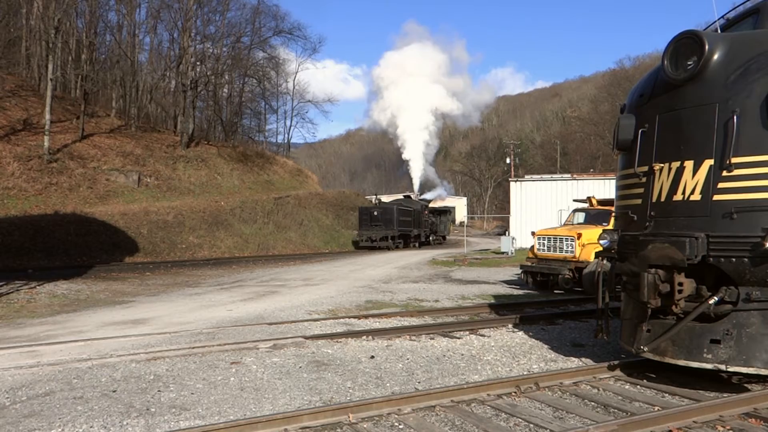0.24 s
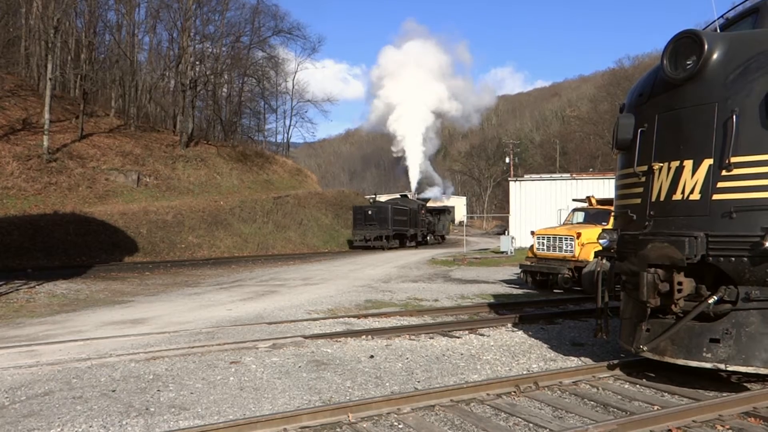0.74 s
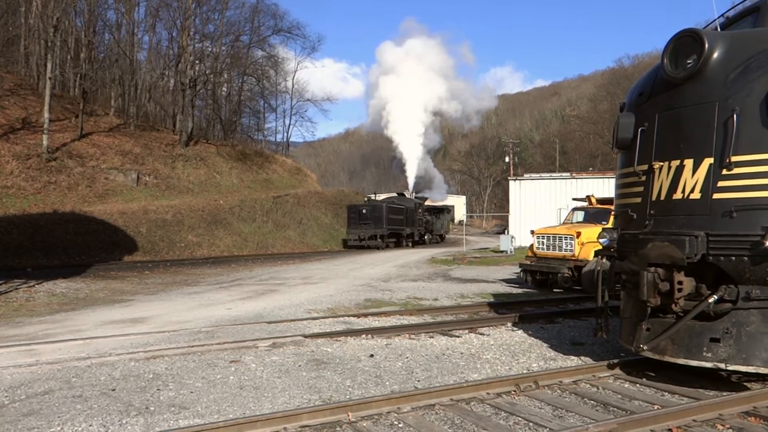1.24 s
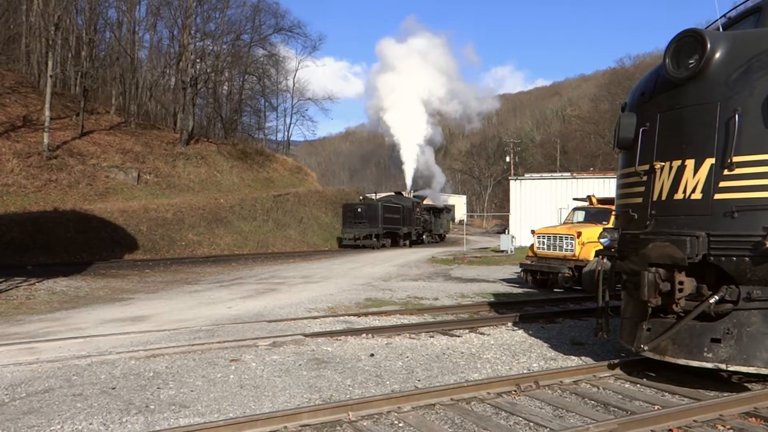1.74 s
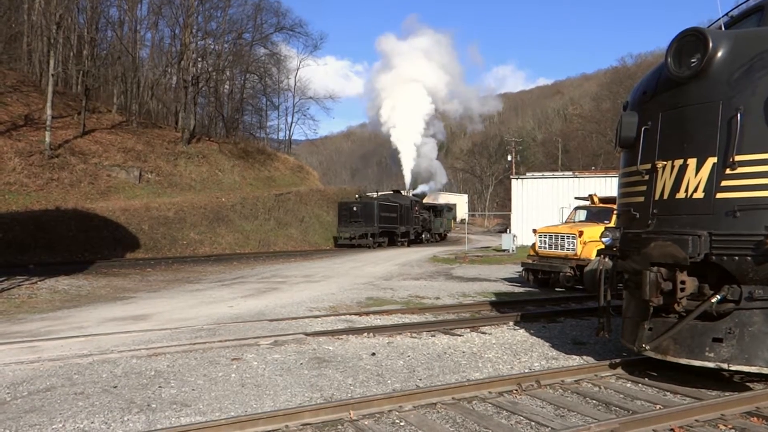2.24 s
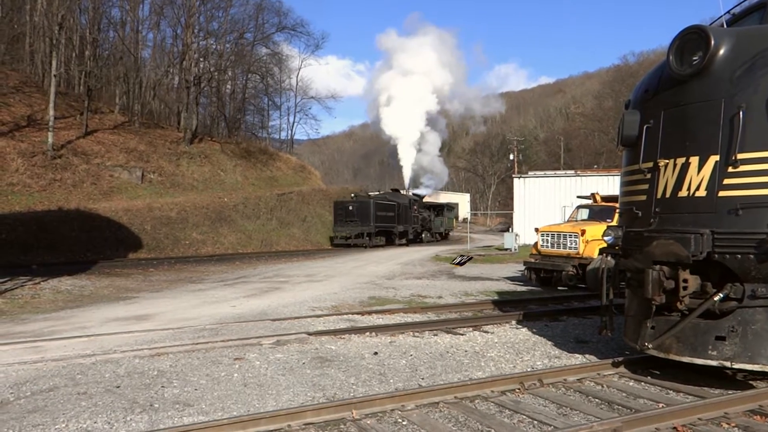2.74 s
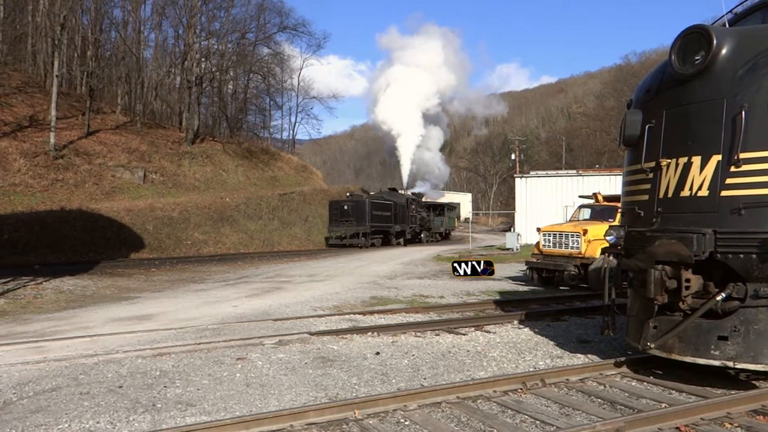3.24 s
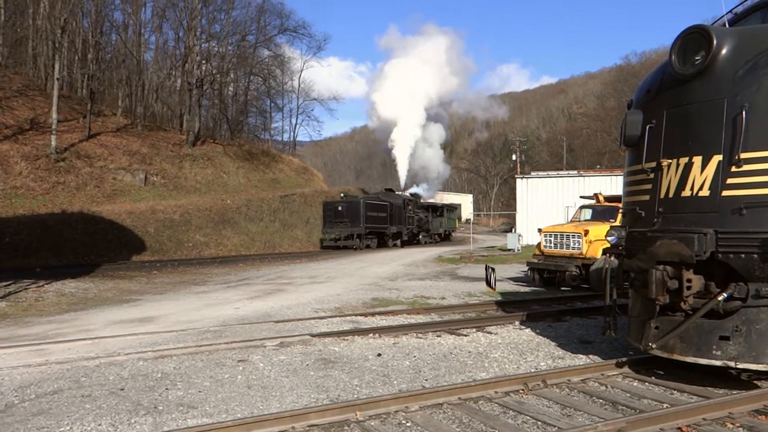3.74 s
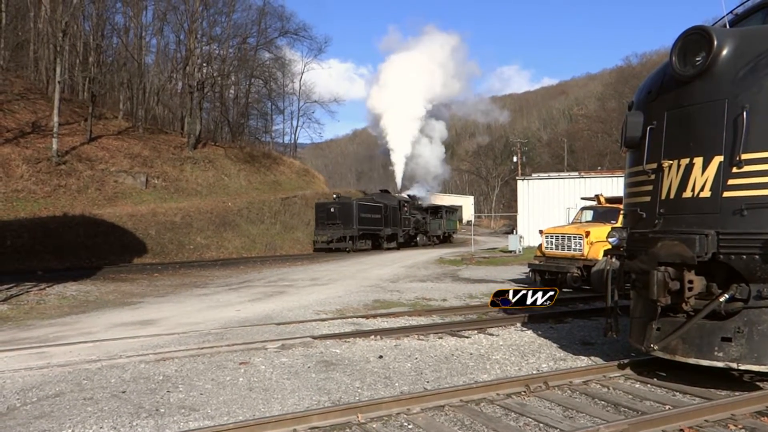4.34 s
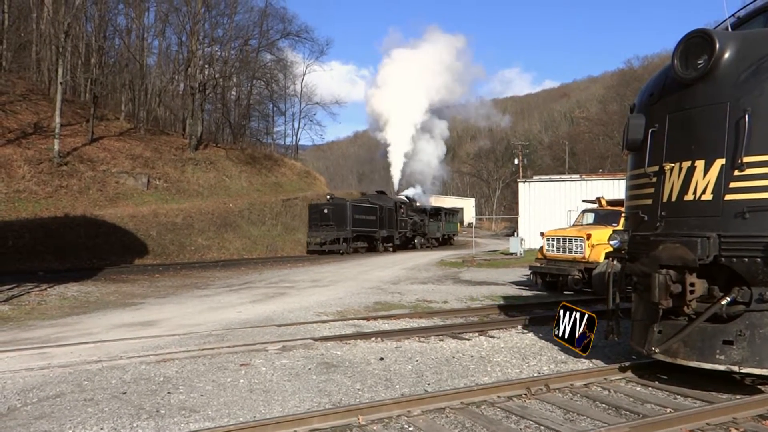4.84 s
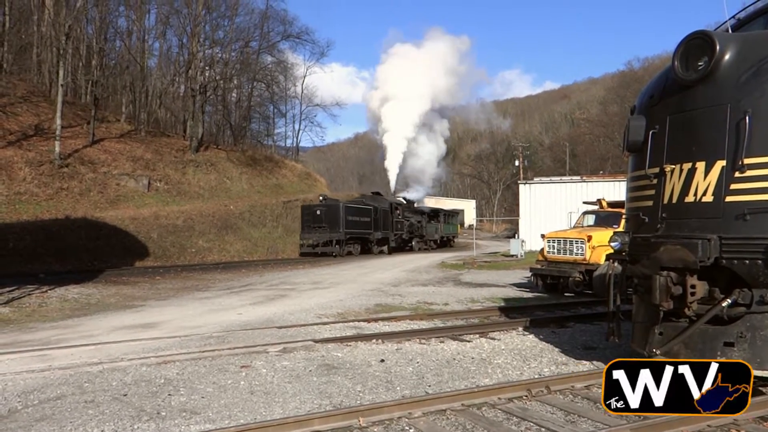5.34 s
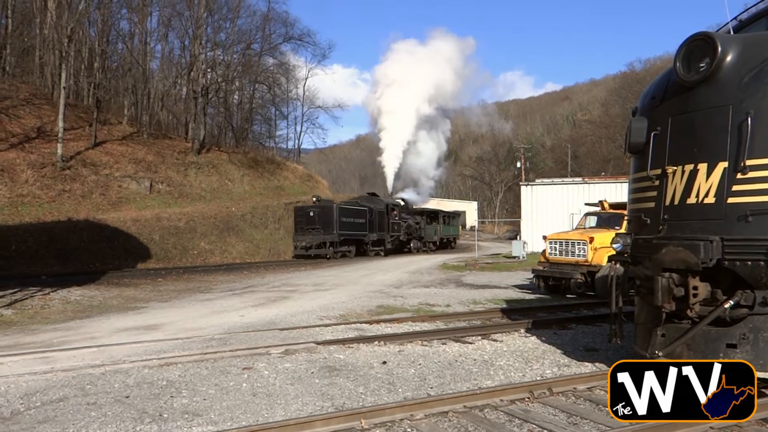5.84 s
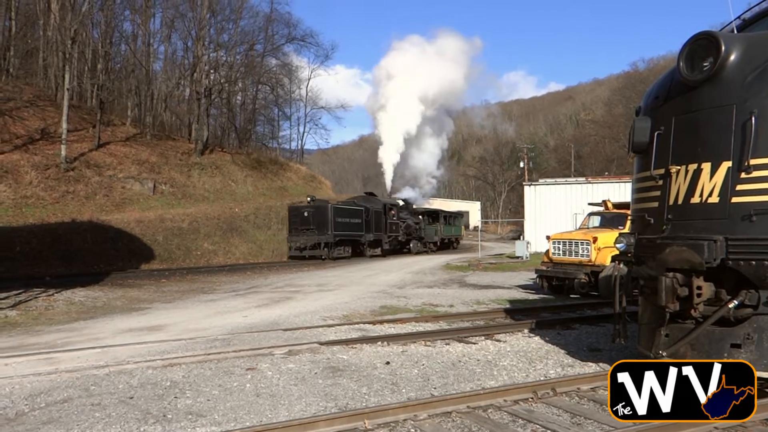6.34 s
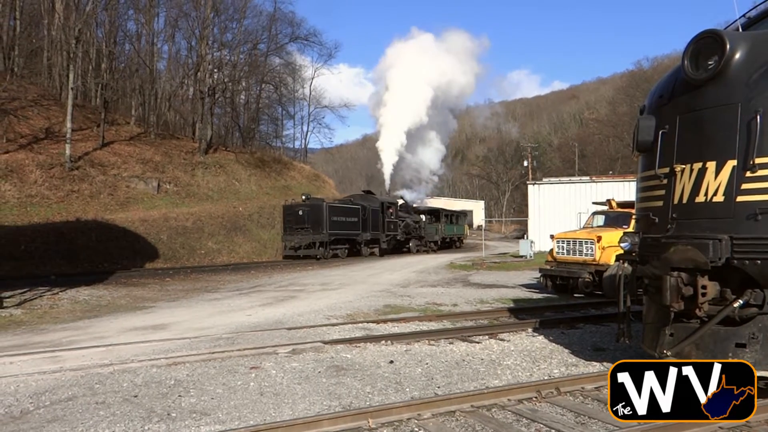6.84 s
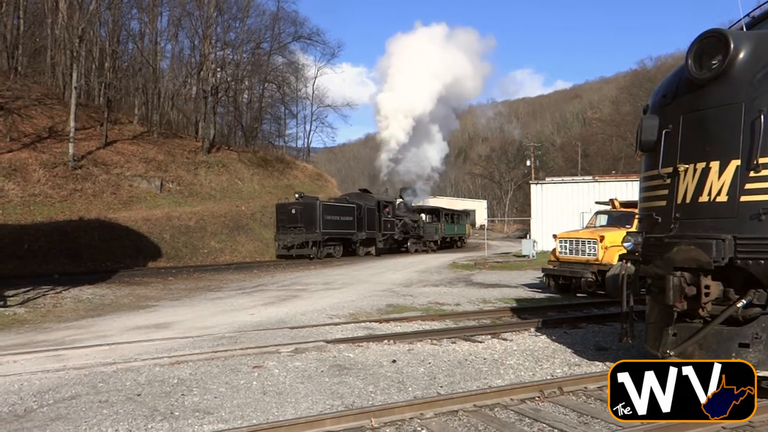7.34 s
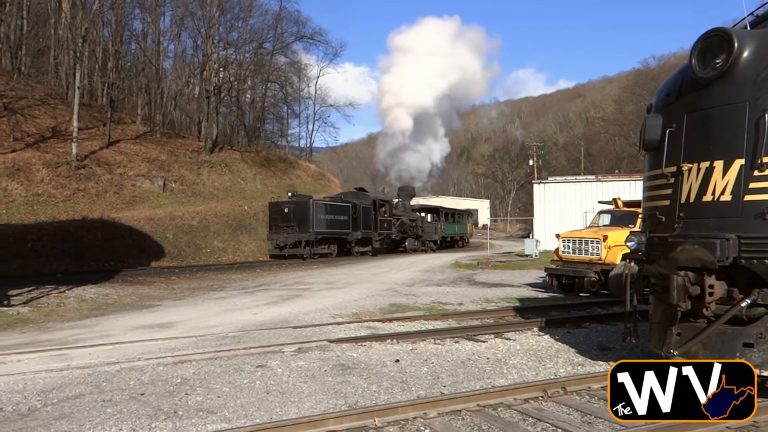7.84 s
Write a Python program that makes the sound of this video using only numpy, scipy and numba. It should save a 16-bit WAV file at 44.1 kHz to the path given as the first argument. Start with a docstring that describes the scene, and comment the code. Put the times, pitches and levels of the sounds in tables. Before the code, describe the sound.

A fixed stereo microphone hears an engine creeping some distance away. Dense escaping steam dominates, carrying a rough high whistle that becomes purer, trembling and rising slightly. Slow low chuffs sit beneath. The steam grows thinner and sharper, sputters with short ragged squeaks, and snaps shut near the end. The surrounding hills hold a brief airy echo, leaving quiet exhaust beats, a faint hush and a few tiny bird chips.

```python
"""A safety valve blows off steam on a locomotive creeping through a yard in a valley.
Shaped noise makes the hiss; a trembling tone and its octave make the whistle, which clears and climbs.
Short sliding tones squeal as the valve chatters, then the steam stops and the hills ring on.
Noise ringing in a chimney makes the chuffing engine, over a faint hush. Pitch dips make a small bird."""
import sys
import numpy as np
from scipy import signal
from scipy.fft import rfft, irfft
from scipy.io import wavfile
from scipy.ndimage import uniform_filter1d
from numba import njit

SR = 44100
rng = np.random.default_rng(int(sys.argv[2]) if len(sys.argv) > 2 else 0)


def generate_wav(sig):
    """Save sig (samples, or channels by samples) to the path in sys.argv[1] as 16-bit PCM at SR."""
    pcm = np.round(np.clip(np.atleast_2d(sig).T, -1, 1) * 32767).astype(np.int16)
    wavfile.write(sys.argv[1], SR, pcm)


N = 356749
TIME = np.arange(N) / SR  # seconds

# level of the engine's rumble as heard, which the beats follow, before trims: time_s [s], level_db [dB]
RUMBLE_LEVEL = [(0.0, -38.5), (1.3, -42.5), (2.37, -42), (5.0, -53), (5.57, -51), (6.02, -57.5),
                (8.09, -45)]


def gain_of(db):
    """Turn decibels into an amplitude factor."""
    return 10 ** (np.asarray(db) / 20)


def evened(x):
    """Scale a signal to an average power of 1."""
    return x / np.sqrt(np.mean(abs(x) ** 2) + 1e-20)


def read(points, hz):
    """Read a table at any frequency, with straight lines along a log frequency scale."""
    f, value = np.transpose(points)
    return np.interp(np.log(hz + 1), np.log(f + 1), value)


def curves(rows, t):
    """Read every column of a timed table at times t, with straight lines between rows."""
    s, *columns = np.transpose(rows)
    return [np.interp(t, s, c) for c in columns]


def add(mix, start_s, sound):
    """Add a sound into the mix at its start time, cut off at the end of the mix."""
    part = mix[round(start_s * SR):][:len(sound)]
    part += sound[:len(part)]


def noise(db_of, patchy_db, flicker_db):
    """Random short-time spectra shaped by db_of(t, hz), with drifting patches and a shared flicker."""
    frames, hz = N // 128 + 5, np.fft.rfftfreq(512, 1 / SR)[:, None]
    a, b, patches = rng.standard_normal((frames, 257, 3)).T
    patches = uniform_filter1d(patches, size=6, axis=0)
    patches = evened(uniform_filter1d(patches, size=24, axis=1))
    flicker = evened(uniform_filter1d(rng.standard_normal(frames), size=8))
    db = db_of(np.arange(frames) * 128 / SR, hz) + patchy_db * patches
    db = db + flicker_db * np.sqrt(hz / 8000) * flicker  # the treble flickers most
    spectra = (a + 1j * b) * gain_of(db)
    return signal.istft(spectra, nperseg=512, noverlap=384)[1][:N]


@njit
def smooth(x, share):
    """One-pole low-pass whose speed changes from sample to sample, power kept."""
    out, state = np.empty_like(x), 0j
    for i in range(len(x)):
        state += share[i] * (x[i] - state)
        out[i] = state * np.sqrt((2 - share[i]) / share[i])
    return out


def waver(width_hz):
    """Complex noise of about power 1 that wanders within about width_hz, with steep skirts."""
    a, b = rng.standard_normal((len(width_hz), 2)).T
    share = 1 - np.exp(-np.pi * width_hz.clip(1) / SR)
    wide = 1 - (1 - share) ** 4
    return smooth(smooth(a + 1j * b, share), wide) * np.sqrt(wide / 4)


def flutter():
    """A slow random swing of power 1: many sines from 1.5 to 12 Hz with random starting phases."""
    hz = np.geomspace(1.5, 12, num=24)[:, None]
    coarse = TIME[::64]
    swings = np.sin(2 * np.pi * (hz * coarse + rng.random(hz.shape))) / hz ** 0.21
    return np.interp(TIME, coarse, evened(swings.sum(0)))


def jet():
    """Turbulent steam rings in the valve pipe; the colour shifts up as the valve closes."""
    # steam jet: time_s [s], level_db [dB before trims], closure [0 open to 1 nearly shut]
    jet_course = [(0.0, -18, 0.01), (1.0, -20.5, 0.01), (1.5, -19, 0.09), (2.7, -21, 0.19),
                  (3.35, -20.5, 0.3), (3.65, -24.5, 0.45), (4.4, -26, 0.65), (4.9, -27.5, 0.83),
                  (5.15, -25.5, 0.74), (5.45, -25.5, 0.57), (5.9, -29, 0.83), (6.03, -32.5, 0.87),
                  (6.45, -29, 0.69), (6.6, -28.5, 0.63), (6.8, -29, 0.72), (7.09, -24.5, .5)]
    # hiss colour with the valve wide open: pitch_hz [Hz], level_db [dB per Hz, relative]
    open_colour = [(250, -30.5), (500, -17), (1000, -3.5), (1450, -12), (2000, -4.5), (2580, -9.5),
                   (3500, -6), (4700, -9.5), (5700, -9), (6100, -8), (9000, -8), (11000, -19),
                   (13000, -27.5), (15800, -32.5)]
    # hiss colour with the valve nearly shut: pitch_hz [Hz], level_db [dB per Hz, relative]
    shut_colour = [(250, -40.5), (500, -19), (1000, -11), (1450, -12), (2000, -6.5), (2550, -9), (3500, -9),
                   (4700, -3), (5400, 4), (6500, -3.5), (9000, -4.5), (11000, -8), (13000, -16.5),
                   (15800, -26)]
    # rings of the valve pipe: pitch_hz [Hz], width_hz [Hz, where the lift has halved],
    # open_lift_db [dB], nearly_shut_lift_db [dB]
    pipe_rings = [(1175, 300, 3, 3.5), (1732, 236, 3, 10.5), (2225, 243, 9.5, 5.5), (2776, 265, 2.5, 9.5),
                  (3250, 500, 3.5, 8.5), (3915, 140, 0.5, 8.5), (4320, 330, 3.5, 6.5),
                  (4980, 290, 6.5, 5.5), (5490, 270, 6.5, 5.5), (8800, 520, -0.5, 3),
                  (9880, 200, 2.5, -0.5), (8200, 250, 3.5, -1), (10400, 250, 1, 0)]
    top_open_db, top_shut_db = -2.5, 6.5  # treble lift, coming in around 7 kHz

    def field(t, hz):
        """Level of the hiss at each time and frequency."""
        level_db, closure = curves(jet_course, t)
        pipe_db = 0
        for ring_hz, width_hz, open_db, shut_db in pipe_rings:
            lift_db = open_db * (1 - closure) + shut_db * closure
            pipe_db = pipe_db + lift_db / (1 + (2 * (hz - ring_hz) / width_hz) ** 2)
        colour_db = read(open_colour, hz) * (1 - closure) + read(shut_colour, hz) * closure
        top_db = top_open_db * (1 - closure) + top_shut_db * closure
        return level_db + colour_db + pipe_db + top_db / (1 + (7000 / hz.clip(1)) ** 6)

    return gain_of(-13) * noise(field, patchy_db=0.53, flicker_db=1.32)


def whistle():
    """An edge tone in the valve gap: a steady part and a wavering part, with its octave."""
    # pitch before it trembles: time_s [s], pitch_hz [Hz]
    pitch_course = [(0, 5725), (.5, 5775), (1, 5805), (1.5, 5768), (2.75, 5782), (3.3, 5845), (3.6, 5868),
                    (4.3, 5910), (5.4, 5925), (5.5, 6045), (5.575, 5935), (5.65, 5935), (5.705, 6095),
                    (5.765, 6000), (5.81, 6120), (5.835, 6030), (5.852, 6115), (5.875, 6020), (5.96, 6020),
                    (6.015, 6180), (6.19, 6095), (6.29, 6185), (6.33, 6120), (6.49, 6115), (6.57, 6260),
                    (6.625, 6480), (6.69, 6295), (6.745, 6135), (6.85, 6125), (6.93, 6155), (7.0, 6165),
                    (7.05, 6225), (7.095, 6400)]
    # strength: time_s [s], level_db [dB before flutter], roughness [0-1], fuzz_width_hz [Hz]
    whistle_course = [(0, -26, .9, 110), (.9, -17.5, 0.93, 90), (1.38, -22.5, 1, 100),
                      (1.55, -21, 0.85, 200), (1.7, -20.5, 0.98, 90), (2.3, -22, .7, 90), (3, -21, .45, 60),
                      (3.45, -19.5, 0.5, 45), (3.65, -17.5, .35, 39.7), (4.97, -16, 0.29, 40),
                      (5.08, -23.5, 0.2, 39.8), (5.36, -18.5, 0.18, 39.9), (5.95, -19.5, 0, 40),
                      (6.03, -12, 0.2, 40), (6.2, -20, 0.2, 40.2), (6.46, -11.5, 0.27, 40),
                      (6.53, -27, 0.4, 80), (6.63, -25, 1, 200), (6.675, -21, 0.4, 50),
                      (6.78, -18, 0.1, 50), (6.94, -19, 0.5, 55), (7.03, -10, .45, 58.3),
                      (7.1, -24, 0.3, 60)]
    # the octave is strong at some pitches and weak at others:
    # whistle_pitch_hz [Hz], octave_db [dB before roughness and flutter]
    octave_strength = [(5720, -47), (5780, -28.5), (5870, -35), (5915, -36.5), (5950, -24.5), (6020, -25.5),
                       (6090, -35.5), (6130, -30.5), (6170, -35), (6270, -23), (6450, -45)]
    tremble_hz, flutter_db, octave_flutter_db = 10.8, 1, 2  # typical size of each random swing
    rough_octave_db = -11  # a rough whistle loses its octave

    (hz,) = curves(pitch_course, TIME)
    level_db, rough, width_hz = curves(whistle_course, TIME)
    rough = rough.clip(0, 1)
    hz = hz + tremble_hz * flutter()
    level_db = level_db + flutter_db * flutter()
    octave_db = read(octave_strength, hz) + rough_octave_db * rough + octave_flutter_db * flutter()
    body = np.sqrt(1 - rough ** 2) + rough * waver(width_hz)
    tone = body * np.exp(2j * np.pi * np.cumsum(hz) / SR)
    octave = tone ** 2 / (abs(tone) + 0.13)  # the wave steepens: twice the phase
    return np.sqrt(2) * (gain_of(level_db) * tone + gain_of(octave_db) * octave).real


def chuffs():
    """Times and levels of the exhaust beats of an engine that slowly speeds up, four beats a turn."""
    # beats in one turn of the crank: place [0-1 of a turn], over_db [dB over the rumble, before trims]
    beats = [(0, 16), (.235, 10), (.49, 7), (.72, 9)]
    # trim of the beats' loudness, one value a turn: level_db [dB]
    turn_level = [-6, -2, 1, -1.5, 4, -1, -0.5, -4, -11, -6]
    first_turn_s, turns_per_s, speedup_per_s2 = .453, 1.054, .02  # speed is that at first_turn_s
    beat_spread_db = 1

    place, over_db = np.transpose(beats)
    turns = (np.arange(-1, 9)[:, None] + place).ravel()
    speed = np.sqrt(turns_per_s ** 2 + 2 * speedup_per_s2 * turns)  # turns per second at each beat
    s = first_turn_s + (speed - turns_per_s) / speedup_per_s2
    db = curves(RUMBLE_LEVEL, s)[0] + np.add.outer(turn_level, over_db).ravel()
    db = db + beat_spread_db * rng.standard_normal(len(s))
    heard = (s > 0) & (s < TIME[-1])
    return zip(s[heard], db[heard])


def engine():
    """A low rumble, and puffs of exhaust that ring in the chimney."""
    # rumble colour: pitch_hz [Hz], level_db [dB per Hz, relative]
    rumble_colour = [(15, -46.5), (25, -14), (150, 1), (184, 1.5), (253, -1.5), (298, -6), (540, -5.5),
                     (606, -7), (745, -12), (2240, -21), (5600, -39), (6000, -44), (7800, -78.5),
                     (13200, -120)]
    # chimney rings: pitch_hz [Hz], width_hz [Hz, between points 6 dB down], level_db [dB, relative]
    chimney_rings = [(101, 27, -7.5), (174.6, 31, -3), (272, 50, -13.5), (566, 60, -11)]

    hz = np.fft.rfftfreq(N, 1 / SR)
    coloured = rfft(rng.standard_normal(N)) * gain_of(read(rumble_colour, hz))
    rumble = gain_of(0.5 + curves(RUMBLE_LEVEL, TIME)[0]) * evened(irfft(coloured, N))
    chimney = sum(gain_of(db) / (1 + 2j * (hz - f) / w) ** 2 for f, w, db in chimney_rings)
    puff = evened(irfft(rfft(rng.standard_normal(N)) * chimney, N))

    t, pressure, blows = np.arange(8000) / SR, np.zeros(N), np.zeros(N)
    for s, db in chuffs():
        # steam pressure jumps up in a few milliseconds, then falls 60 dB per 0.33 s
        add(pressure, s, gain_of(db - 60 * t / 0.33) * (1 - np.exp(-t / 0.0047)))
        add(blows, s, [gain_of(db)])
    ring = irfft(chimney, N)  # each beat also knocks the chimney once
    thump = irfft(rfft(blows) * chimney, N) / abs(ring).max()
    return rumble + gain_of(-8.5) * pressure * puff + gain_of(-0.5) * thump


def air():
    """The still air of the yard: a faint hush of shaped noise."""
    # hush colour: pitch_hz [Hz], level_db [dB per Hz, relative]
    hush_colour = [(880, -24), (1500, -0.5), (3000, -6), (5790, -20), (5990, -21), (7130, -19),
                   (11000, -36), (14300, -74.5), (22000, -120)]
    hush = noise(lambda t, hz: read(hush_colour, hz) + 0 * t, patchy_db=-0.5, flicker_db=3.0)
    return gain_of(-60) * evened(hush)


def valley(x):
    """Countless echoes through restless air: each band's power lingers and dies, with random phase."""
    # how long the hills ring: pitch_hz [Hz], fade_s [s to fall by 60 dB]
    hill_fade = [(200, 0.56), (700, 1.3), (1400, 2.16), (2500, 1.6), (4200, 1.07), (6200, 0.91),
                 (8000, 0.66), (10000, 0.54), (14000, 0.58)]
    hz, t, z = signal.stft(x, SR, nperseg=1024, noverlap=768)
    # share of the power kept from one frame to the next
    far = gain_of(-120 * t[1] / read(hill_fade, hz))
    near = gain_of(-120 * t[1] / 0.41)  # 0.41 s to fall by 60 dB
    power = np.array([signal.lfilter([0, 0, 1 - k], [1, -k], p) for k, p in zip(far, abs(z) ** 2)])
    power /= 1 + (hz[:, None] / 11000) ** 4  # the long path loses treble
    # wagons and sheds close by
    power += gain_of(-6.0) ** 2 * signal.lfilter([0, 1 - near], [1, -near], abs(z) ** 2)
    a, b = rng.standard_normal((len(t), len(hz), 2, 2)).T  # two independent echoes
    echoes = np.sqrt(power) * (a + 1j * b)
    return signal.istft(echoes, SR, nperseg=1024, noverlap=768)[1][:, :N]


def squeals():
    """Short, ragged tones as the valve disc chatters on its seat; the last is an echo of the whistle."""
    # tones: start_s [s], length_s [s], start_hz [Hz], end_hz [Hz], level_db [dB before raggedness]
    squeal_list = [(6.505, 0.057, 8250, 8150, -33), (6.53, 0.043, 6900, 6800, -29),
                   (6.533, 0.014, 5700, 5650, -30), (6.558, .04, 9200, 9300, -30.5),
                   (6.583, 0.024, 9100, 8350, -27), (6.598, 0.041, 7560, 7600, -22),
                   (6.608, .04, 8750, 8700, -30.5), (6.61, 0.041, 8200, 8200, -28),
                   (6.648, 0.037, 7370, 7380, -19), (6.66, .04, 8500, 8260, -32),
                   (6.682, 0.032, 7520, 7400, -24), (6.73, .022, 7460, 7450, -31),
                   (6.79, .022, 7480, 7480, -40), (7.068, 0.019, 8340, 8700, -20.5),
                   (7.085, 0.015, 7800, 7680, -18), (7.089, 0.011, 6950, 6800, -25),
                   (7.107, 0.038, 6300, 6180, -19.5)]
    out, ragged = np.zeros(N), 0.79 + 0.92 * waver(np.full(N, 250.))
    for s, length_s, start_hz, end_hz, db in squeal_list:
        hz = np.linspace(start_hz, end_hz, round(length_s * SR))
        wobble = ragged[round(s * SR):][:len(hz)] * signal.windows.tukey(len(hz), .4)
        tone = (wobble * np.exp(2j * np.pi * np.cumsum(hz) / SR)).real
        add(out, s, gain_of(db) * np.sqrt(2) * tone)
    return out


def bird():
    """Each chip sweeps down and up again, loudest at the bottom; branches smear a near echo."""
    # chips: lowest_point_s [s], lowest_hz [Hz], level_db [dB at the lowest point]
    chip_list = [(7.729, 7000, -55), (7.784, 6900, -53), (7.843, 6900, -51), (7.902, 6900, -51),
                 (7.961, 7000, -62), (7.984, 7000, -55)]
    t, out = np.arange(-300, 300) / SR, np.zeros(N)
    for s, low_hz, db in chip_list:
        hz = low_hz + 3200 * (abs(t) / 0.006) ** 1.6
        loudness = gain_of(db - 24 * abs(t) / 0.0089) * np.hanning(len(t)) ** .5
        add(out, s + t[0], np.sin(2 * np.pi * np.cumsum(hz) / SR) * loudness)
    late = np.arange(2500) / SR
    # the echo starts after 7 ms and falls 60 dB per 0.08 s
    smear = rng.standard_normal(len(late)) * gain_of(-60 * late / .08) * (late > .007)
    return out + gain_of(-9) * signal.oaconvolve(out, smear / np.linalg.norm(smear))[:N]


def scene():
    """Mix steam, echoes, engine, hush and bird into a middle and a side signal, then left and right."""
    # strength of the side signal: pitch_hz [Hz], level_db [dB before trims]
    side_colour = [(60, -30), (110, -36.5), (200, -50), (380, -36.5), (700, -11.5), (1290, -19),
                   (2380, -12), (4400, -18), (8120, -14.5), (15000, -55)]
    opening = np.clip((7.095 - TIME) / 0.0105, 0, 1)  # the valve snaps shut
    steam = opening * (jet() + whistle()) + squeals()
    echo, scattered = valley(steam)
    chuffing, chips = engine(), bird()
    mid = gain_of(0.5) * steam + gain_of(-3.0) * echo + chuffing + air() + chips
    # left and right differ through scattered echoes and slightly delayed engine and bird
    delayed = np.roll(chuffing, shift=700) + gain_of(6) * np.roll(chips, shift=12)
    apart = scattered + gain_of(1.0) * delayed
    side_db = -1.0 + read(side_colour, np.fft.rfftfreq(N, 1 / SR))
    side = irfft(rfft(apart) * gain_of(side_db), N)
    side += gain_of(-10) * air()  # the hush comes from all around
    return gain_of([[-.1], [.1]]) * np.array([mid + side, mid - side])


def record(dry):
    """Quick gain control pulls the level toward its running mean, peaks round off; then the band limit."""
    power_db = 10 * np.log10(abs(uniform_filter1d((dry ** 2).mean(0), size=500)) + 1e-12)
    over_db = power_db - uniform_filter1d(power_db, size=15000)
    loud = np.clip((power_db + 30) / 5, 0, 1)  # it only acts on loud sound
    held = dry / gain_of(0.57 * uniform_filter1d(loud * over_db, size=200))
    rounded = 1.115 * np.tanh(held / 1.08)
    edge = signal.firwin(2047, 15770, window=("kaiser", 12), fs=SR)  # low-pass, edge in Hz
    return signal.oaconvolve(rounded, edge[None], "same")


dry = scene()
out = record(dry)
generate_wav(out)
```